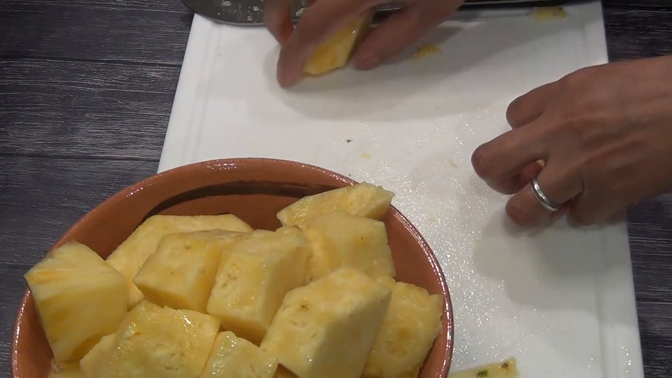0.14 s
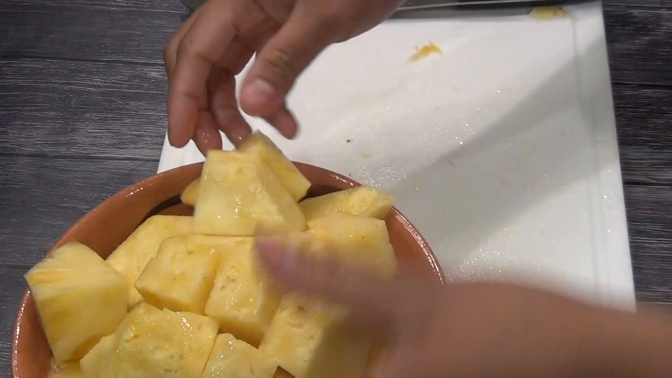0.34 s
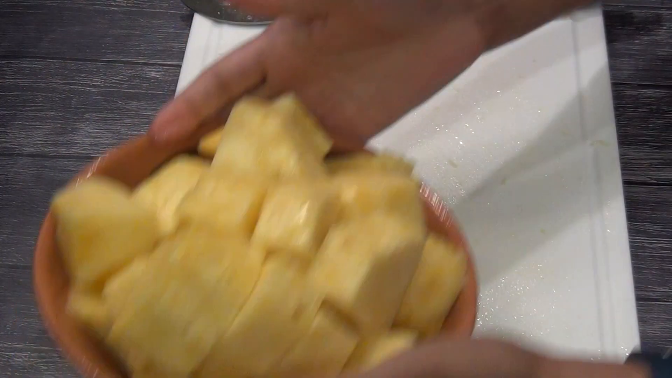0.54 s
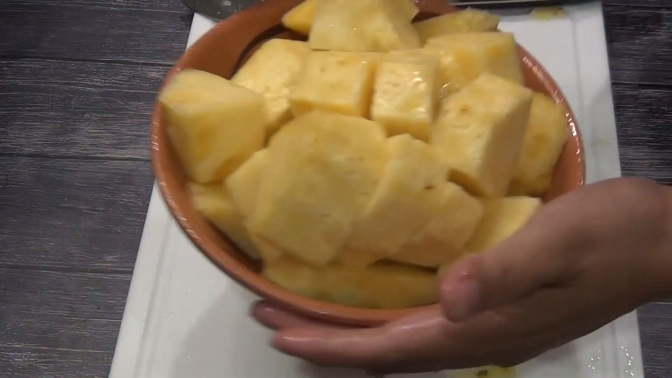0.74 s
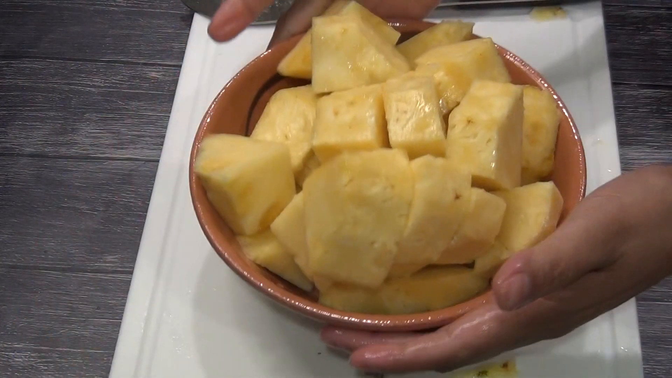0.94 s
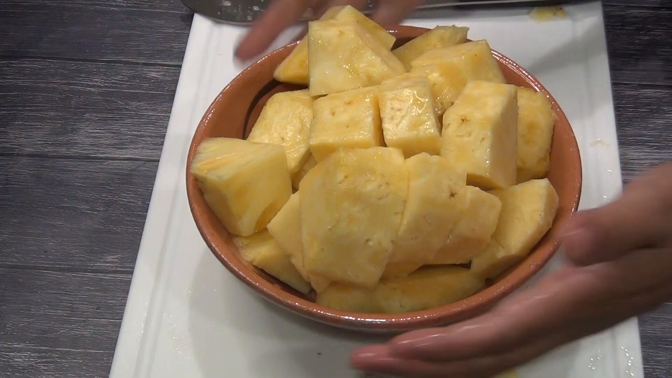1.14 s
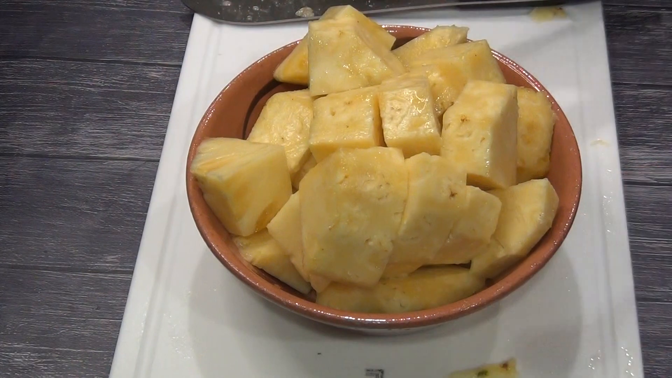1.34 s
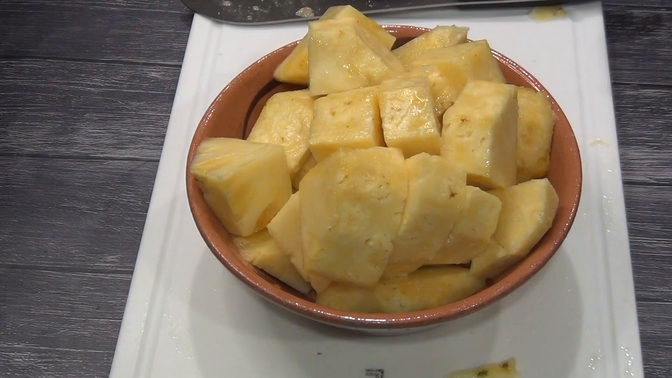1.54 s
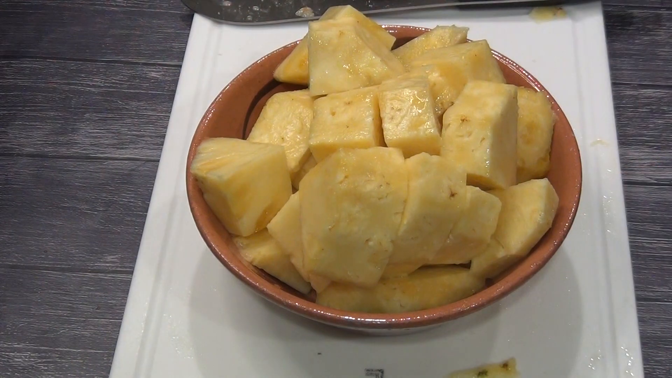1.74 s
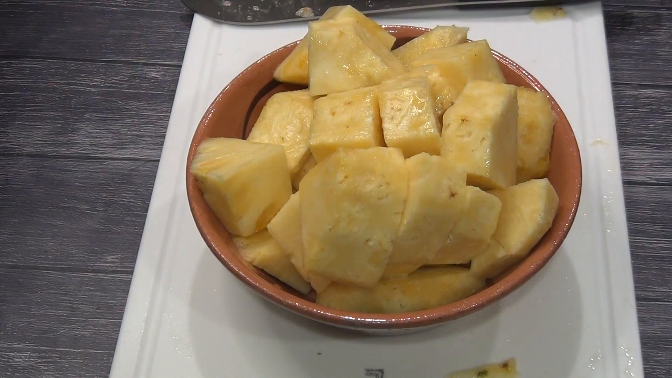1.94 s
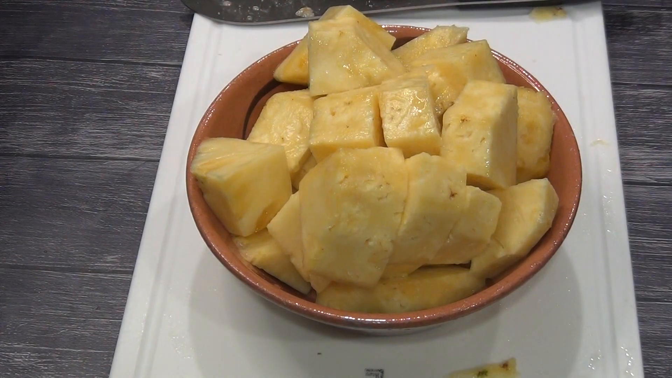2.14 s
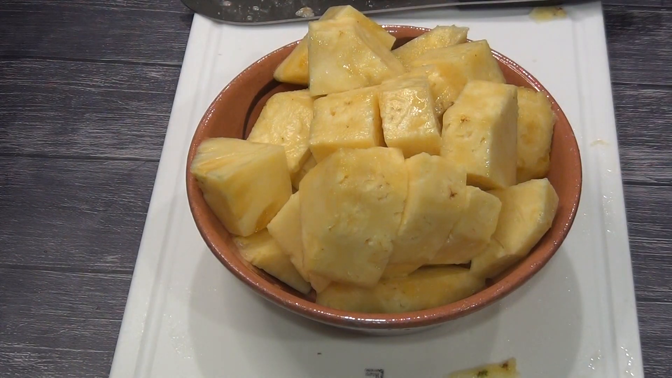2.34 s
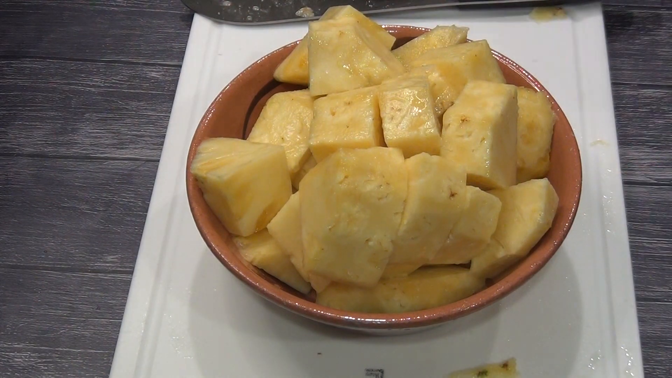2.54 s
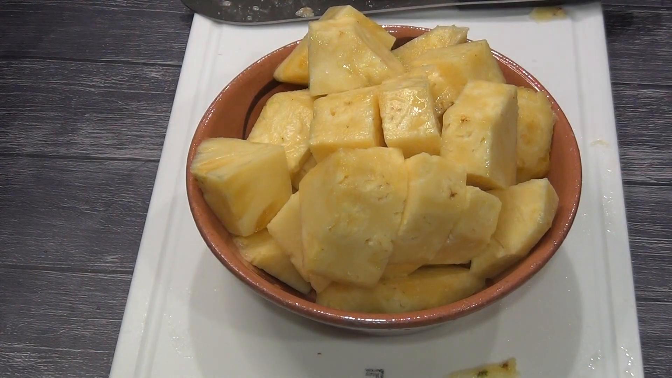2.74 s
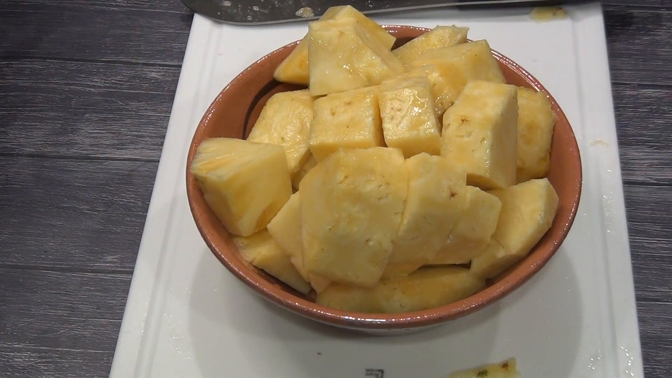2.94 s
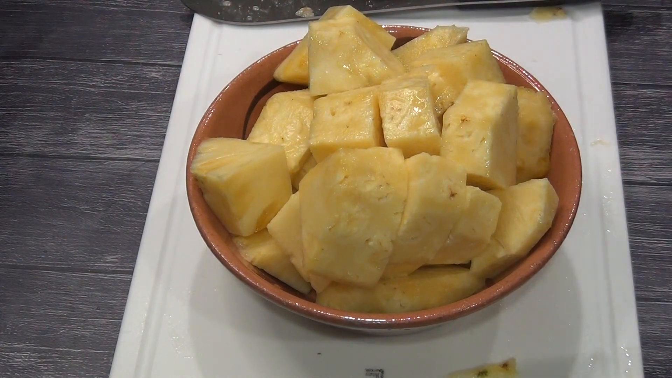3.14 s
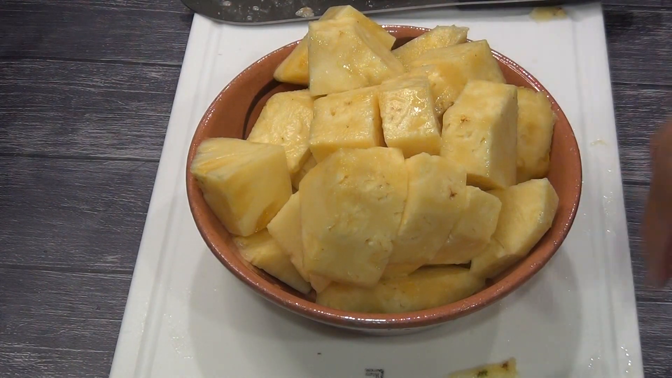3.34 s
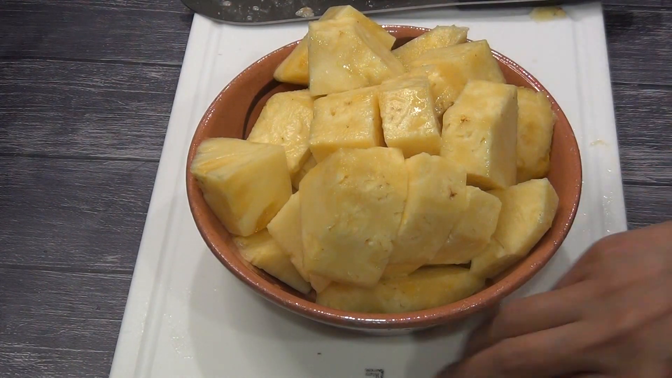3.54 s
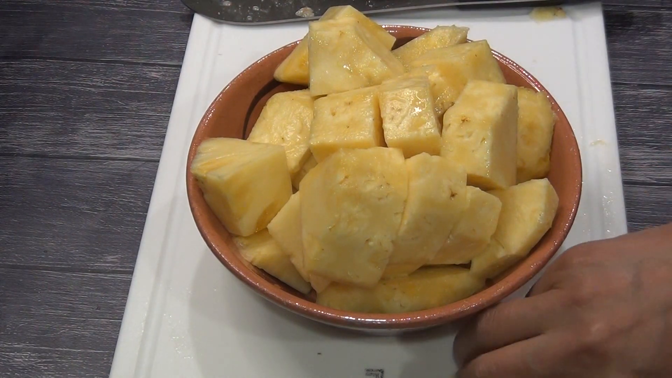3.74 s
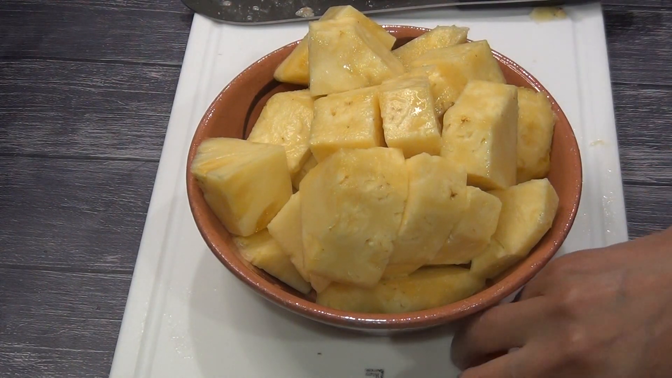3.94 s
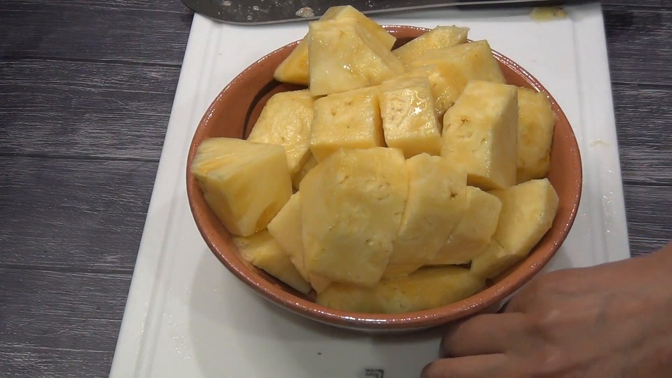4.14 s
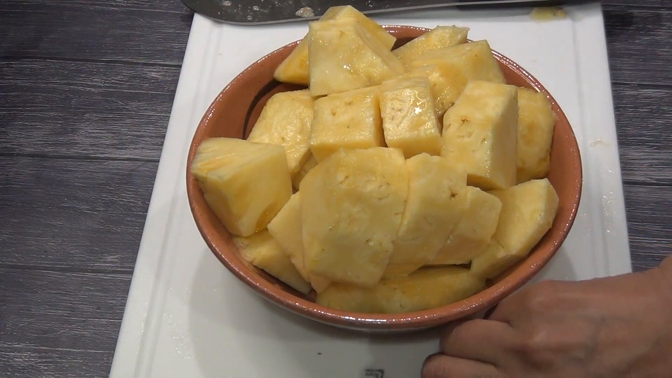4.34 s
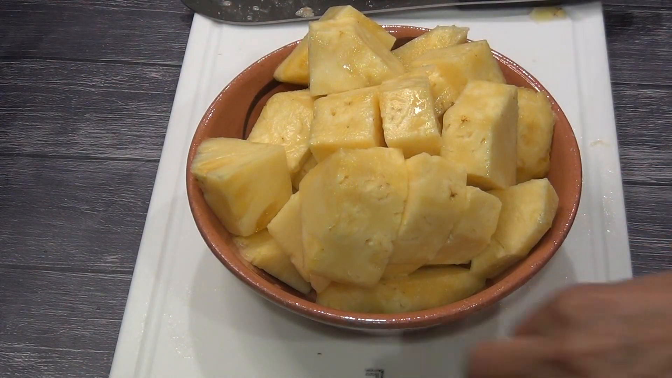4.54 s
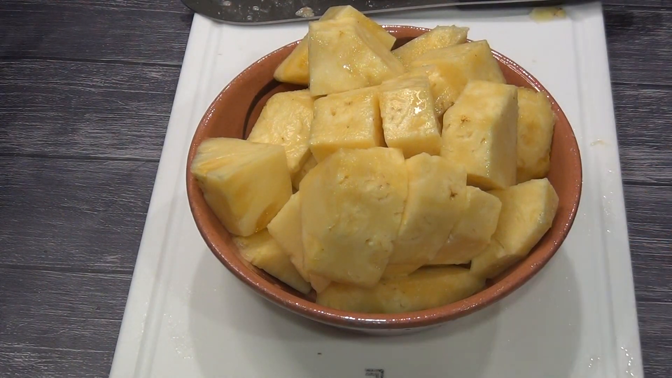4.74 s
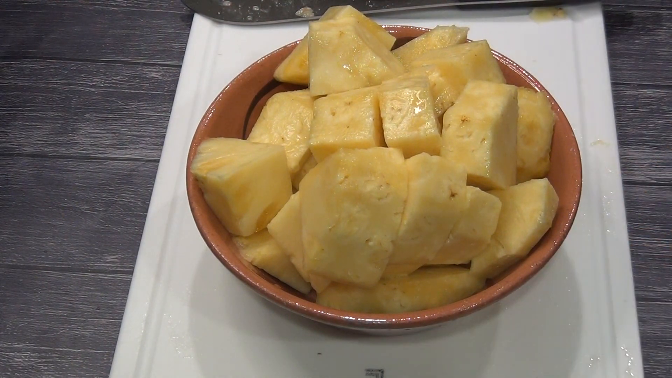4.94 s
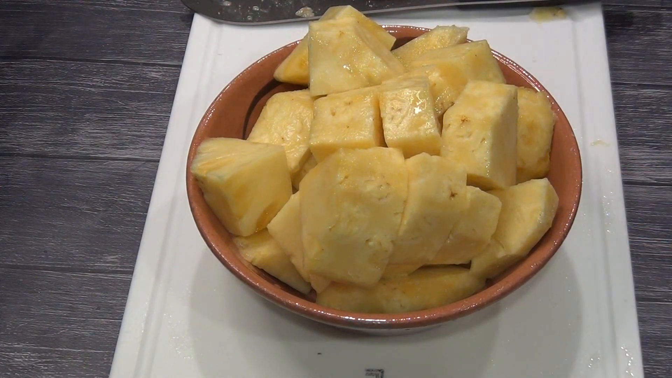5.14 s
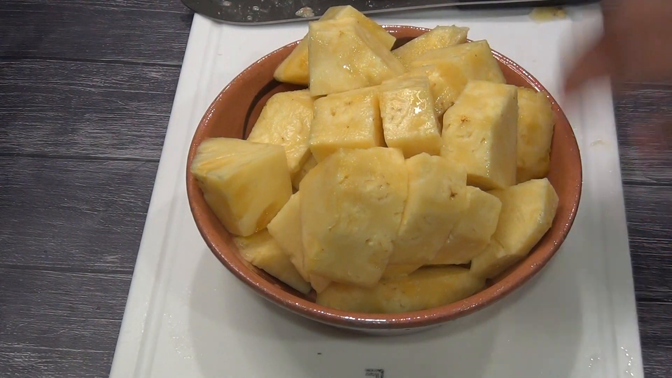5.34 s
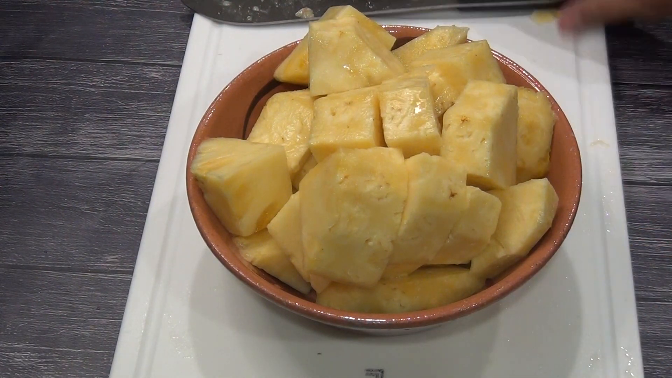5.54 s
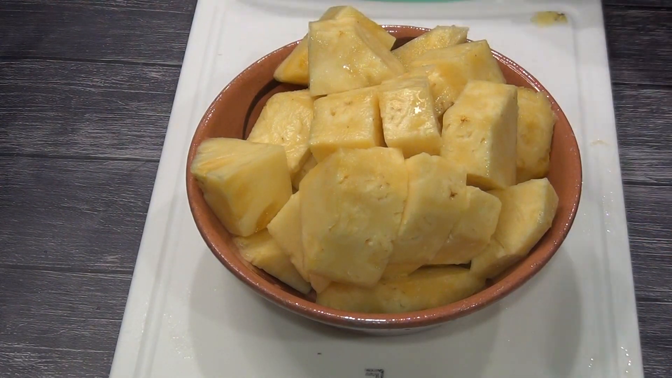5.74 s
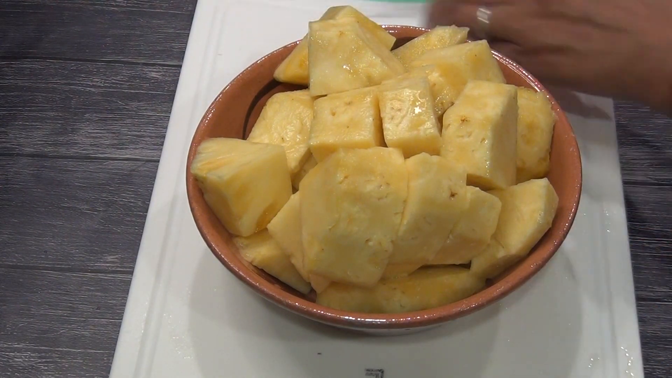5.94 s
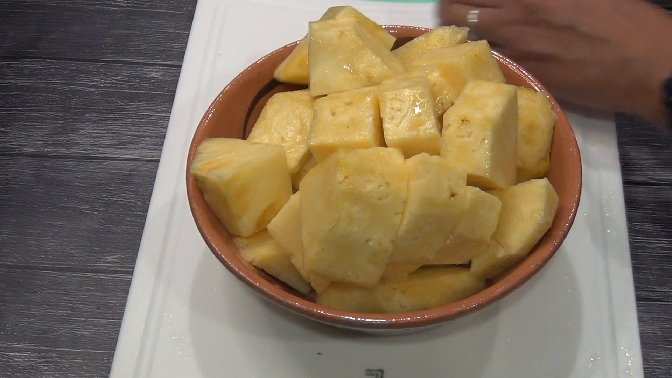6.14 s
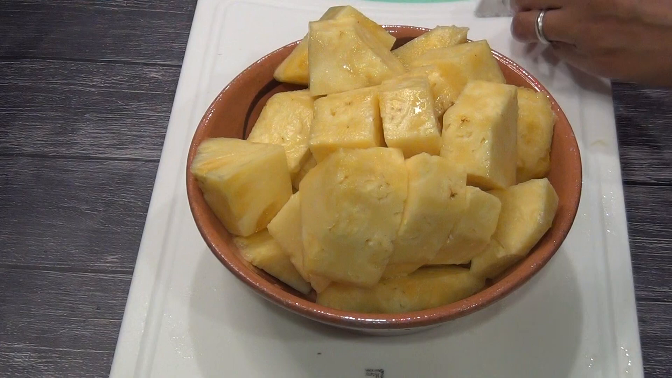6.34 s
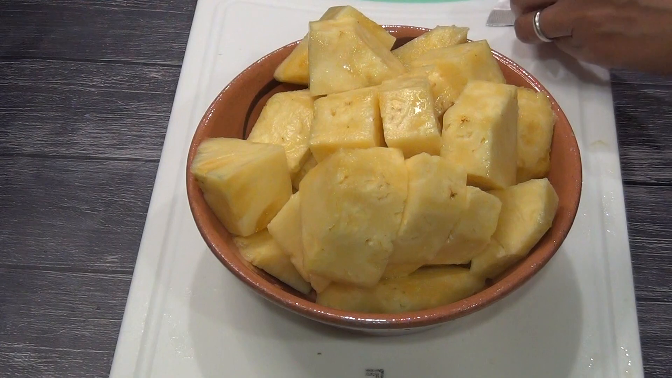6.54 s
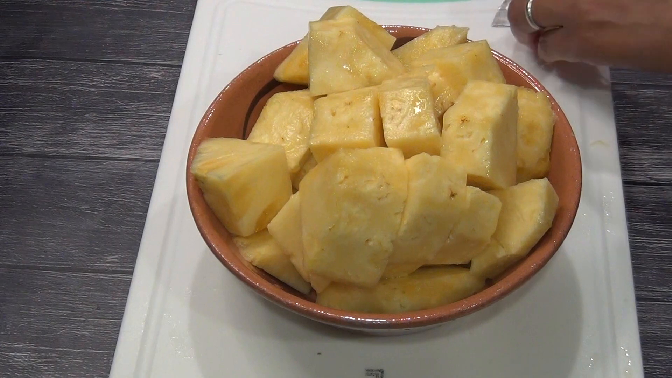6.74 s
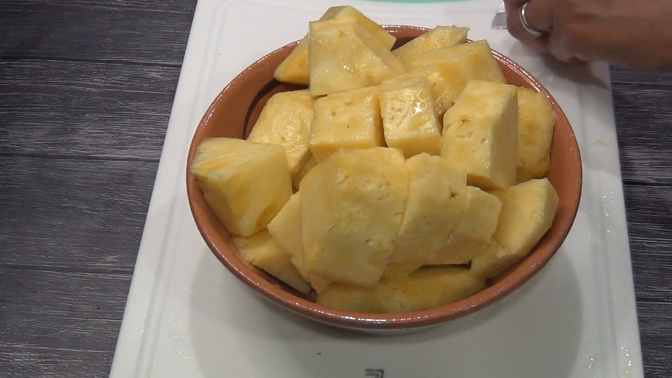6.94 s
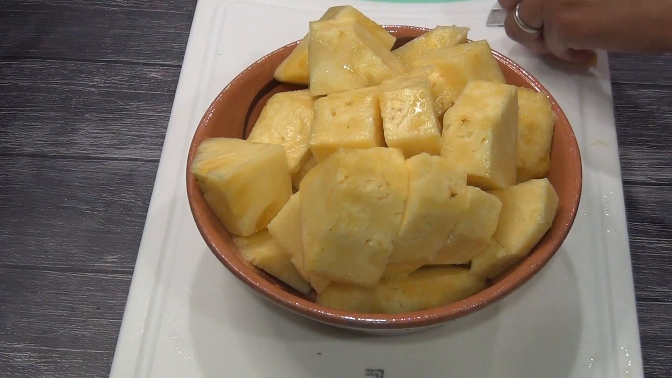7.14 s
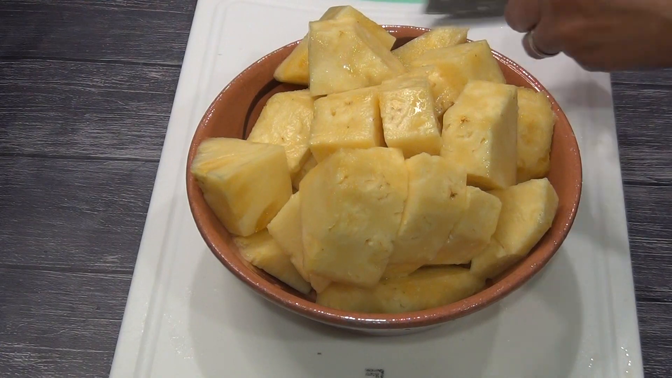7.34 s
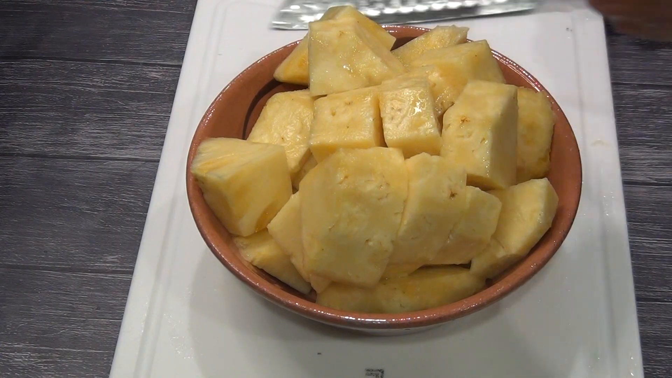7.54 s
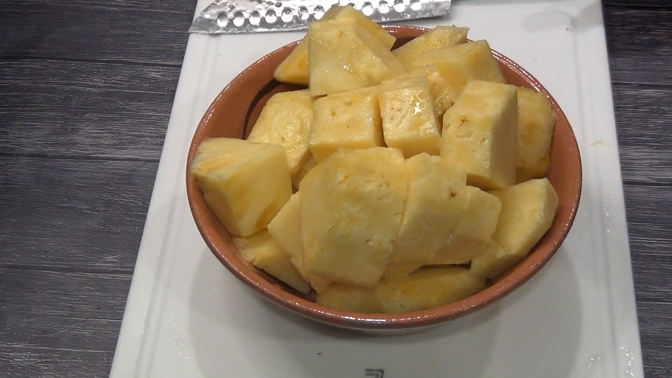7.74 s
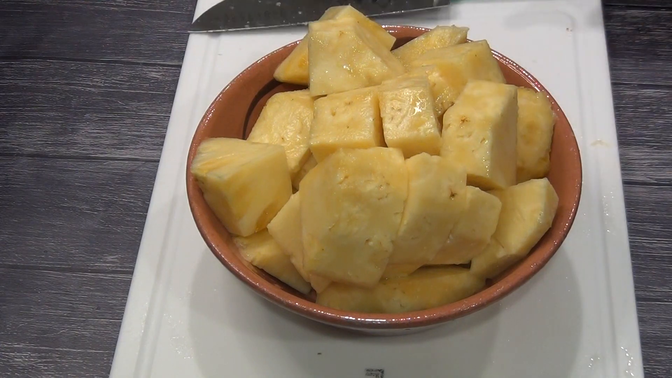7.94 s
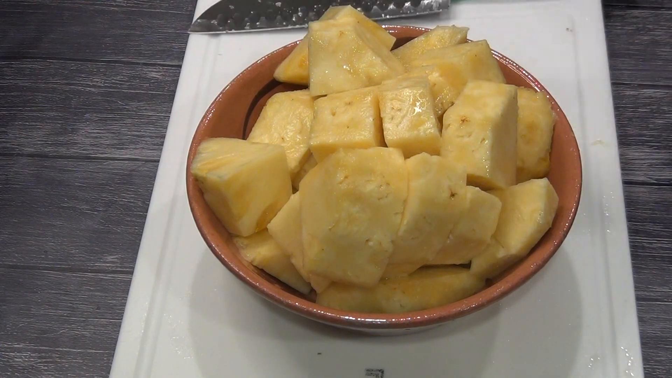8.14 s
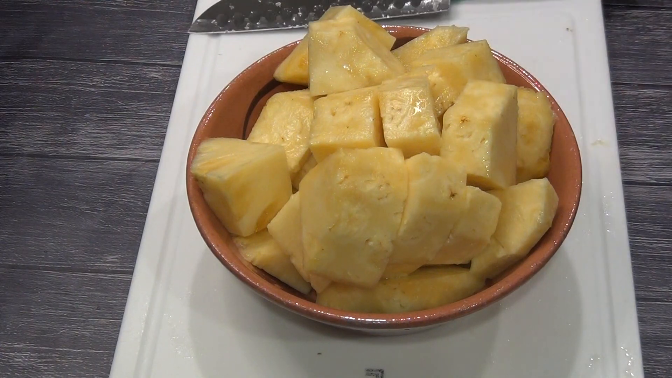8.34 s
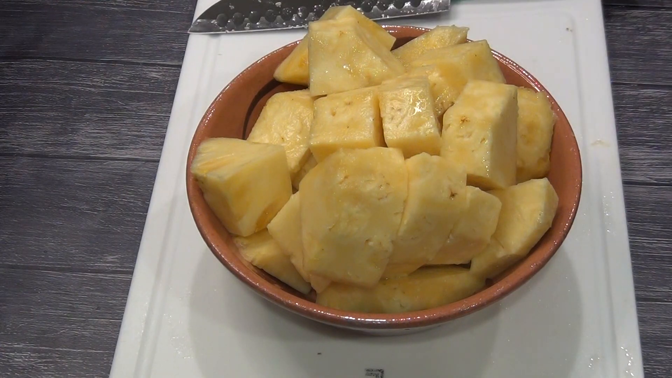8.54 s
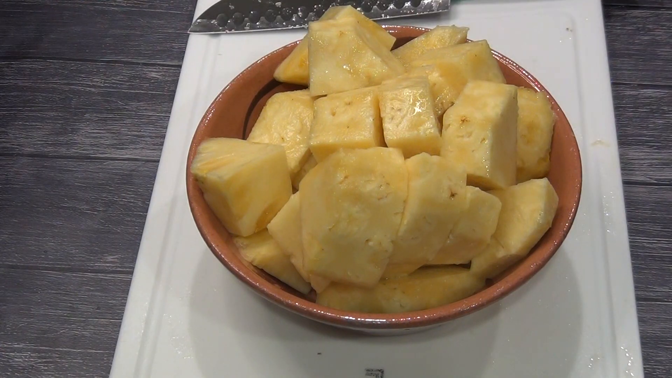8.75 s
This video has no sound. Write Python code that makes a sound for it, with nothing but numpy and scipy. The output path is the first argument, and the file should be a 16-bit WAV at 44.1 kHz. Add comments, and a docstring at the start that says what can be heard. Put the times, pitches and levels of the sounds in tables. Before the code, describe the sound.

After half a second of silence, a clay bowl clinks lightly, then lands on a plastic cutting board at 1 second with a firm, briefly chattering knock. Very faint hand wiping on cloth and two tiny ticks follow until 3 seconds. From 3.6 to 4.6 seconds fingernails scratch and click at a tag, and a hand bumps the board softly at 5. At 5.6 seconds a knife knocks sharply, then slides and scrapes over the board with lighter taps until 7. Between 7.5 and 7.8 it is laid down in a loud clatter with a short skid and a slight ring of the blade. It rocks in quick, fading taps until about 8.4, when a last knock comes from further along the counter. The microphone is close above the board; the small kitchen adds brief reverberation over quiet hiss and appliance hum.

```python
"""A knife knocks and slides on a plastic cutting board, is laid down and rocks to rest. Before that, a clay
bowl of pineapple chunks clinks as it is lifted and lands on the board, hands are wiped, and nails pick at
a tag; a last knock comes from the counter. Each impact excites the damped modes of the bodies in contact,
and each rub is a train of stick-slip pulses. The small kitchen reverberates over a quiet hiss and hum."""
import sys
import numpy as np
from scipy import signal
from scipy.fft import rfft, irfft, next_fast_len
from scipy.io import wavfile
from scipy.ndimage import map_coordinates

SR = 44100
rng = np.random.default_rng(int(sys.argv[2]) if len(sys.argv) > 2 else 0)


def master(y):
    """Save y as 16-bit WAV."""
    cut = np.clip(np.atleast_2d(y).T, -1, 1)
    pcm = np.round(cut * 32767)  # scale
    wavfile.write(sys.argv[1], SR, pcm.astype(np.int16))


N = 388103

# Reverberation time of the kitchen: f/Hz, T60/s
KITCHEN_T60 = [(100, 0.54), (400, 0.61), (1300, 0.63), (3500, 0.54), (8000, 0.41), (15000, 0.37)]
# Envelope of the background: t/s, level/dB
ROOM_LEVEL = [(1.55, -66.5), (3.35, -62), (5.1, -58.5), (7.35, -56), (8.75, -58.5)]
# Appliance tones: f/Hz, relative level/dB
HUM_TONES = [(60, -17.5), (120, -16.5), (194, -11)]

# Spectra of room, impact and friction noise: f/Hz, relative spectral level/dB
AIR_SPECTRUM = [(15, -40), (25, -18), (70, -8), (165, -9), (200, -2), (235, -5.5), (276, -2.5), (572, -6.5),
                (654, -3.5), (791, -9.5), (1060, -6), (1550, -9), (1780, -4), (2090, -9), (2800, -9.5),
                (3300, -12.5), (15800, -24)]
PUSH_SPECTRUM = [(120, -59), (200, -27), (506, -15.5), (585, -17), (890, -3.5), (1230, -14.5), (1980, -9.5),
                 (2290, -19), (4750, -14), (6020, -19.5), (15500, -33)]
CLAY_SPECTRUM = [(35, -55), (60, -16), (206, -35), (368, 4), (475, -19), (546, -7.5), (1020, 0),
                 (1500, 4.5), (2000, -4.5), (4420, -19), (8870, -38.5), (15500, -64)]
CLOTH_SPECTRUM = [(300, -32), (1000, -8), (2800, -2.5), (6000, -7), (10000, -14), (15000, -26)]
WORKTOP_SPECTRUM = [(53, -45), (90, -19), (161, 8), (328, -33), (357, -11), (846, 9.5), (1070, -15),
                    (1580, 2.5), (3290, -10.5), (15500, -42)]
NAIL_SPECTRUM = [(88, -59), (150, -6), (681, -15), (1450, 2), (1660, -12), (2600, -16), (2980, -9.5),
                 (3410, -29), (4140, -29), (4650, -25.5), (15500, -50)]
HANDLE_SPECTRUM = [(88, -54), (150, -19), (583, -4), (1040, 4.5), (1240, 0), (2760, -11), (4220, -24.5),
                   (10500, -38), (15500, -60)]
DRAG_SPECTRUM = [(120, -51), (200, -26), (378, -12), (575, -16), (769, 1), (842, -11), (1050, 1),
                 (1560, 0.5), (1840, -3), (4500, -17.5), (15500, -53)]
EDGE_SPECTRUM = [(200, -17), (1000, -8), (2500, 9), (4500, -11), (9000, -11), (15500, -22)]

# Lightly damped modes: f/Hz, relative level/dB, T60/s
RIM_MODES = [(856, -12, .1), (1453, -1, .1), (2724, -4, .16), (3700, -3, .2), (4032, -6, .18),
             (5163, -8, .2), (6800, -8, .12), (8600, -9, .17), (10420, -13, .13)]
BLADE_MODES = [(2480, 0, .15), (3350, -1, .15), (3800, -1, .15), (4958, -4, .2), (5593, -3, .2),
               (6010, -6, .15), (7327, -1, .22), (7850, -6, .15), (8274, -5, .15), (8690, -2, .15),
               (8834, -3, .15), (9340, -7, .15), (10174, -9, .15), (11100, -6, .15), (12000, -8, .18),
               (13221, -11, .15), (15100, -12, .15)]
# Resonances: f/Hz, bandwidth/Hz before the damping factor, relative level/dB
BOWL_ON_BOARD = [(257, 23, -20), (356, 41, -10.5), (464, 41, -17), (740, 26, -11), (1140, 99, 2),
                 (1450, 100, 2.5), (1770, 100, -5), (2050, 210, -5)]
TICK_RESONANCES = [(2450, 310, 5), (3260, 160, -3)]
BOARD_RESONANCES = [(159, 50, -14.5), (257, 26, 1), (323, 93, 0.5), (1180, 390, -10), (1710, 240, -16.5)]
TAG_RESONANCES = [(1142, 66, 1.5), (1420, 140, 2), (1930, 80, -10), (2970, 130, -6), (3970, 450, -12.5),
                  (6400, 710, -22)]
KNIFE_ON_BOARD = [(282, 21, -14.5), (500, 44, -14.5), (627, 17, -8.5), (773, 37, 0), (1042, 72, 2.5),
                  (1503, 34, -2), (1683, 110, -7.5), (1933, 53, -4.5), (2140, 77, -14), (2710, 290, -15.5),
                  (3525, 120, -23), (3770, 370, -22.5), (4980, 110, -25.5)]
COUNTER_RESONANCES = [(166, 200, -12), (256, 62, -17), (800, 56, -1), (1295, 110, 4), (1500, 24, -1),
                      (1910, 53, 0), (2150, 120, -7), (2954, 27, -9), (2940, 32, -21)]

# Impacts: t/s, level/dB before the band gains, low thud/dB and bright snap/dB relative to that level
RIM_CLINKS = [(0.494, -50, -21, 3), (0.508, -48, -23, -1), (0.522, -50.5, -9, -14), (0.542, -44, -13.5, -7),
              (1.022, -42, -10, 4)]
FAINT_TICKS = [(2.045, -54, -24, -15), (2.746, -64, -15, 5.5)]
HAND_BUMPS = [(2.95, -61.5, 5.8, -13), (2.985, -67, 3.6, -11), (5.0205, -39.5, 5.1, -21.5)]
COUNTER_KNOCKS = [(8.3655, -35.5, -3, 0.5), (8.3695, -24.5, -11.5, -30), (8.378, -38.5, -8, -5),
                  (8.388, -32.5, -17, -6)]
# Nails catching on the tag, likewise: t/s, level/dB, snap/dB
NAIL_CATCHES = [(3.653, -46.5, -2), (3.739, -45.5, 0), (3.767, -47, -7), (3.785, -39.5, -7),
                (3.792, -39.5, -5), (3.9045, -34, -2), (3.924, -36, -16), (3.938, -46, -5),
                (3.967, -44, -7), (4.095, -54, -1), (4.158, -56.5, -4), (4.427, -53.5, -12),
                (4.567, -50.5, -1)]
# Knife impacts, likewise: t/s, level/dB, thud/dB, snap/dB, f/Hz favoured by the point of contact
KNIFE_KNOCKS = [(5.564, -24, -8, -21, 850), (5.575, -17.5, -13, -20.5, 2150),
                (5.5825, -28.5, -7.5, -15, 910), (5.646, -27, -15, -25, 965), (5.853, -33.5, 0, -22, 780),
                (6.386, -38, -10, -9, 840), (6.452, -37.5, -6, -4, 870), (6.94, -40, -1.5, -8, 1350),
                (7.5405, -16.5, -18, -24, 1700), (7.564, -26.5, -15, -17, 1710),
                (7.701, -31, -21, -28, 1060), (7.718, -24, -15, -13, 1060), (7.731, -20.5, -22, -10, 1040),
                (7.7745, -17, -9.5, -16.5, 870), (7.795, -21, -20, -13, 940)]
# The two sides the knife rocks on: relative level/dB, thud/dB, snap/dB, favoured f/Hz
NEAR_SIDE, FAR_SIDE = (-0.5, -13, -10.5, 2700), (-2, -22, -14, 1024)

# Weight coming onto the worktop: t/s, rumble level/dB
WORKTOP_LOADS = [(1.02, -56), (2.97, -56), (3.68, -61.5), (3.99, -58.5), (5.58, -57.5), (5.85, -62),
                 (6.15, -66), (6.25, -60), (6.48, -65), (7.56, -68), (7.78, -57), (8.65, -61)]
# Strokes of hands on cloth and of nails on the tag: peak t/s, rise/s, fall/s, level/dB
HAND_WIPES = [(1.79, 0.11, 0.12, -61.5), (2.59, 0.28, 0.23, -65), (2.81, 0.052, 0.15, -60.5),
              (5.24, 0.052, 0.09, -61), (6.015, 0.15, 0.1, -58)]
NAIL_SCRATCHES = [(3.74, 0.1, 0.081, -48), (3.93, 0.018, 0.052, -46.5)]
# Strokes of the knife: peak t/s, rise/s, fall/s, rub level/dB, hiss level/dB, kind of stroke
KNIFE_STROKES = [(5.566, 0.008, 0.077, -35.5, -63, "push"), (5.715, 0.074, 0.088, -49.5, -55, "push"),
                 (5.836, 0.049, 0.028, -42, -54.5, "push"), (6.195, 0.018, 0.049, -40, -56, "drag"),
                 (6.245, 0.074, 0.072, -33.5, -42, "drag"), (6.411, 0.12, 0.089, -32.5, -54, "push"),
                 (6.7, 0.093, 0.06, -56, -63, "drag"), (6.85, 0.07, 0.058, -53.5, -60.5, "drag"),
                 (6.955, 0.068, 0.11, -52.5, -59.5, "drag"), (7.7, 0.16, 0.017, -61, -46.5, "glide"),
                 (7.727, 0.039, 0.038, -27, -40, "skid")]


def amp(db):
    """Amplitude ratio of a level in decibels."""
    return 10 ** (np.asarray(db) / 20)


def unit(x):
    """Normalisation to rms 1."""
    return x / np.sqrt(np.mean(x ** 2) + 1e-20)


def along(points, hz):
    """Interpolation on a logarithmic frequency axis."""
    f, values = np.transpose(points)
    return np.interp(np.log(hz + 1), np.log(f + 1), values)


def coloured(x, spectrum):
    """Spectral shaping of an excitation, at rms 1."""
    size = next_fast_len(len(x) + 8192)
    response = amp(along(spectrum, np.fft.rfftfreq(size, 1 / SR)))
    return unit(irfft(rfft(x, size) * response, size)[:len(x)])


def band(x, kind, hz):
    """Causal third-order filtering."""
    return signal.sosfilt(signal.butter(3, hz, kind, fs=SR, output="sos"), x)


def ring(modes, vary_db=2):
    """Modal superposition: decaying sinusoids of slightly random strength, at rms 1."""
    t = np.arange(SR // 3) / SR
    return unit(sum((-1) ** k * amp(db + vary_db * rng.standard_normal() - 60 * t / t60)
                    * np.sin(2 * np.pi * hz * t) for k, (hz, db, t60) in enumerate(modes)))


def damped(resonances, damping):
    """Bandwidth sets decay: a wider resonance gives a mode that starts harder and dies sooner."""
    return [(hz, db + 20 * np.log10(width), np.log(1000) / (np.pi * width * damping))
            for hz, width, db in resonances]


def clustered(modes):
    """Mode splitting: an irregular body has three close modes in place of each one, and they beat."""
    return [(hz * (1 + .012 * rng.standard_normal()), db, t60) for hz, db, t60 in modes for _ in range(3)]


def favoured(modes, centre_hz, boost_db=11):
    """Selective excitation: the point of contact lifts the modes near one frequency."""
    return [(hz, db + boost_db * np.exp(-(np.log2(hz / centre_hz) / 0.12) ** 2), t60)
            for hz, db, t60 in modes]


def impacts(rows, modes, spectrum, crack_db, crack_t60, thud_db, body_db, snap_db, rise_s=0.00051):
    """Impact excitation: modes ring under a noisy crack; weight sets the thud, hardness the snap."""
    track, t = np.zeros(N), np.arange(SR // 3) / SR
    for s, db, thud, snap, *spot in rows:
        crack = unit(coloured(rng.standard_normal(len(t)), spectrum) * amp(-60 * t / crack_t60))
        tone = ring(favoured(modes, *spot) if spot else modes, vary_db=1)
        blow = (tone + amp(crack_db) * crack) * (1 - np.exp(-t / rise_s))
        start = round(s * SR)
        for kind, hz, band_db in (("bandpass", [90, 500], thud + thud_db),
                                  ("bandpass", [550, 3000], body_db), ("highpass", 3420, snap + snap_db)):
            part = band(blow, kind, hz)
            part *= amp(db + band_db) / np.std(part[:SR // 125])  # the first 8 ms set the level
            track[start:start + len(t)] += part[:N - start]
    return track


def friction(slips_per_s, grit_db=2):
    """Stick-slip friction: tiny random pulses, stronger where the surface catches."""
    catches = map_coordinates(rng.standard_normal(N // 200 + 4), [np.arange(N) / 200], order=1)
    return rng.standard_normal(N) * (rng.random(N) < slips_per_s / SR) * amp(grit_db * catches)


def swell(s, rise_s, fall_s):
    """Gaussian envelope of a stroke, 20 dB down at rise_s before its peak and fall_s after it."""
    t = np.arange(N) / SR - s
    return amp(-20 * np.minimum((t / np.where(t < 0, rise_s, fall_s)) ** 2, 10))


def kitchen(x, tail_db, walls_db):
    """Reverberation: early reflections from counter and walls, then a diffuse exponential tail."""
    t = np.arange(SR * 3 // 4) / SR
    hz, _, noise = signal.stft(rng.standard_normal(len(t)), SR, nperseg=256)
    frame_s = np.arange(noise.shape[1]) * 128 / SR
    decay = amp(-60 * frame_s / along(KITCHEN_T60, hz)[:, None])
    tail = signal.istft(noise * decay, SR, nperseg=256)[1][:len(t)]
    tail *= 1 - np.exp(-(t / 0.0053) ** 2)
    walls = rng.standard_normal(len(t)) ** 3 * amp(-60 * t / 0.13) * (t > .004)
    echo = amp(tail_db) * tail / np.linalg.norm(tail) + amp(walls_db) * walls / np.linalg.norm(walls)
    return x + signal.fftconvolve(x, echo)[:N]


def background():
    """Superposition of low room noise, appliance hum and hiss; the level grows slowly, then eases."""
    t = np.arange(N) / SR
    air = coloured(rng.standard_normal(N), AIR_SPECTRUM)
    hum = sum(amp(db) * np.sqrt(2) * np.sin(2 * np.pi * (hz * t + rng.random())) for hz, db in HUM_TONES)
    low, hiss = unit(band(air, "lowpass", 1465)), unit(band(air, "highpass", 2580))
    envelope = amp(np.interp(t, *np.transpose(ROOM_LEVEL)))
    return envelope * (low + amp(-1) * hum + amp(-6.5) * hiss)


def bowl(landing_s=0.9923, gap_s=0.0073, loss_db=0.7):
    """Free vibration: the clay rim clinks under the hands; the foot lands and chatters at an even pace."""
    clinks = impacts(RIM_CLINKS, clustered(RIM_MODES), PUSH_SPECTRUM,
                     crack_db=6, crack_t60=0.021, thud_db=0, body_db=0, snap_db=-4.5, rise_s=0.00028)
    touchdown = [(landing_s, -21, -10, -11.5)]  # t/s, level/dB, thud/dB, snap/dB
    chatter = [(landing_s + (k + 1) * gap_s, -31.5 - loss_db * k, -7.5, -11.5) for k in range(5)]
    landing = impacts(touchdown + chatter, damped(BOWL_ON_BOARD, damping=3.4), CLAY_SPECTRUM,
                      crack_db=1.5, crack_t60=0.029, thud_db=-5.5, body_db=-1, snap_db=-0.5,
                      rise_s=0.00078)
    landing = band(landing, "lowpass", 8400)
    return kitchen(clinks, tail_db=-8.5, walls_db=-6) + kitchen(landing, tail_db=0, walls_db=-7)


def worktop_rumble():
    """Forced vibration: the worktop rumbles faintly as weight comes onto it."""
    load = sum(amp(db) * swell(s, rise_s=0.057, fall_s=0.14) for s, db in WORKTOP_LOADS)
    return load * unit(band(rng.standard_normal(N), "bandpass", [40, 160]))


def wiping():
    """Friction noise: cloth fibres hiss under the hands."""
    envelope = sum(amp(db) * swell(*shape) for *shape, db in HAND_WIPES)
    return envelope * coloured(friction(slips_per_s=9000), CLOTH_SPECTRUM)


def ticks():
    """Heavily damped vibration: two faint, high ticks."""
    return impacts(FAINT_TICKS, damped(TICK_RESONANCES, damping=1.4), CLOTH_SPECTRUM,
                   crack_db=-12, crack_t60=0.04, thud_db=-5, body_db=-1.5, snap_db=4)


def board_bumps():
    """Soft impact: a hand excites chiefly the low modes of the board."""
    bumps = impacts(HAND_BUMPS, damped(BOARD_RESONANCES, damping=1), WORKTOP_SPECTRUM,
                    crack_db=-21.5, crack_t60=0.021, thud_db=1, body_db=1.5, snap_db=13)
    return kitchen(bumps, tail_db=-8.5, walls_db=-2)


def tag_picking():
    """Stick-slip excitation: nails ring the tag with single catches and with runs of tiny jerks."""
    catches = [(s, db, -17, snap) for s, db, snap in NAIL_CATCHES]  # all with the same weak thud
    picks = impacts(catches, damped(TAG_RESONANCES, damping=0.83), NAIL_SPECTRUM,
                    crack_db=0.5, crack_t60=0.064, thud_db=-4, body_db=3, snap_db=-0.5, rise_s=0.00092)
    slips = friction(slips_per_s=2500, grit_db=0.5)
    ringing = unit(signal.fftconvolve(slips, ring(damped(TAG_RESONANCES, damping=1.3)))[:N])
    scratch = unit(ringing + amp(0.5) * coloured(slips, NAIL_SPECTRUM))
    return picks + scratch * sum(amp(db) * swell(*shape) for *shape, db in NAIL_SCRATCHES)


def knife():
    """Coupled vibration: the handle knocks, slides and rocks on the board; impacts ring the blade too."""
    knocks = impacts(KNIFE_KNOCKS, damped(KNIFE_ON_BOARD, damping=0.92), HANDLE_SPECTRUM,
                     crack_db=-5, crack_t60=0.037, thud_db=-6.5, body_db=-4, snap_db=-1.5, rise_s=0.00035)
    slides = (sliding("push", PUSH_SPECTRUM, board_db=-21, steel_db=-4)
              + sliding("drag", DRAG_SPECTRUM, board_db=-26, steel_db=-28)
              + sliding("glide", EDGE_SPECTRUM, board_db=-6, steel_db=-2)
              + sliding("skid", HANDLE_SPECTRUM, board_db=-4, steel_db=-22))
    hits = knocks + rocking()
    steel = ring(clustered(BLADE_MODES))
    singing = signal.fftconvolve(band(hits, "highpass", 7400), steel / np.linalg.norm(steel))[:N]
    return kitchen(hits + amp(-14.5) * singing + slides, tail_db=-12, walls_db=-14)


def sliding(kind, spectrum, board_db, steel_db):
    """Sliding friction: dense slips drive a rub in board and handle and a shimmering hiss in the blade."""
    slips = friction(slips_per_s=7000)
    board = unit(signal.fftconvolve(slips, ring(damped(KNIFE_ON_BOARD, damping=0.37)))[:N])
    steel = unit(signal.fftconvolve(slips, ring(clustered(BLADE_MODES)))[:N])
    scrape = coloured(slips, spectrum) + amp(board_db) * board
    rub = unit(band(scrape, "lowpass", 2260))
    hiss = unit(unit(band(scrape, "highpass", 3850)) + amp(steel_db) * steel)
    return sum(swell(*shape) * (amp(rub_db) * rub + amp(hiss_db) * hiss)
               for *shape, rub_db, hiss_db, stroke in KNIFE_STROKES if stroke == kind)


def rocking(start_s=7.853, first_period_s=0.1275, shrink=0.922, loss_db=2):
    """Damped rocking: the knife taps on each side in turn, every swing shorter and weaker than the last."""
    taps = []
    for tap in range(9):
        swing, far = divmod(tap, 2)
        swing_s = start_s + first_period_s * (1 - shrink ** swing) / (1 - shrink)  # geometric series
        lag_s = far * 0.0775 * 0.986 ** swing
        side_db, *timbre = FAR_SIDE if far else NEAR_SIDE
        taps.append((swing_s + lag_s, -30 - loss_db * swing + side_db, *timbre))
    return impacts(taps, damped(KNIFE_ON_BOARD, damping=1.32), HANDLE_SPECTRUM,
                   crack_db=1, crack_t60=0.013, thud_db=-6.5, body_db=-1, snap_db=3, rise_s=0.0054)


def counter_knock():
    """Distance lowers the direct-to-reverberant ratio: something is put down further along the worktop."""
    knock = impacts(COUNTER_KNOCKS, damped(COUNTER_RESONANCES, damping=1.5), WORKTOP_SPECTRUM,
                    crack_db=0, crack_t60=0.063, thud_db=-2.5, body_db=-2, snap_db=1)
    return kitchen(knock, tail_db=-8, walls_db=-13)


def scene():
    """Linear superposition of all sources at one microphone above the board."""
    mix = background() + bowl() + worktop_rumble() + wiping()
    mix += kitchen(ticks() + tag_picking(), tail_db=-13, walls_db=-15)
    return (mix + board_bumps() + knife() + counter_knock())[None]


def record(dry, start_s=0.493, top_hz=15850):
    """Gating and band limiting: silence until start_s, and nothing above top_hz."""
    live = dry * (np.arange(N) / SR >= start_s)
    size = next_fast_len(N + 8192)
    passband = np.fft.rfftfreq(size, 1 / SR) < top_hz
    return irfft(rfft(live, size) * passband, size)[..., :N]


dry = scene()
out = record(dry)
master(out)
```